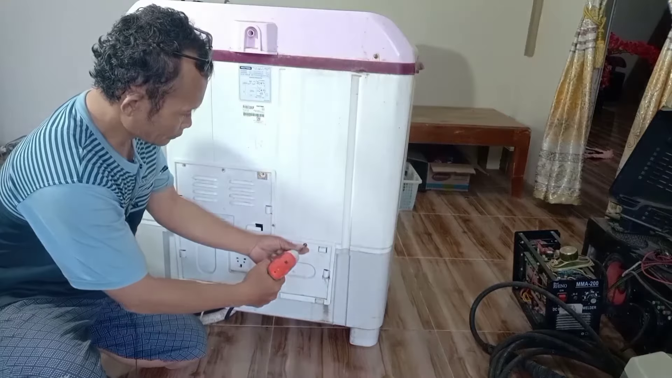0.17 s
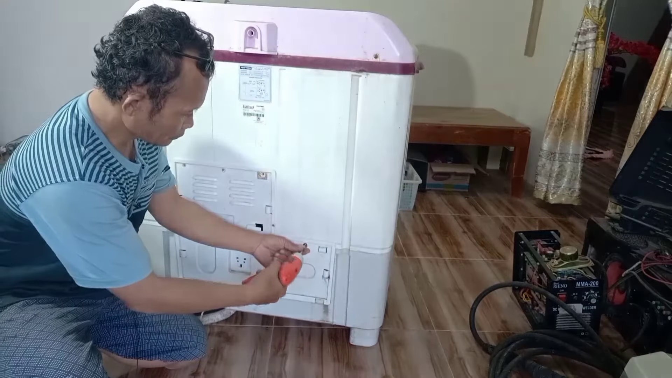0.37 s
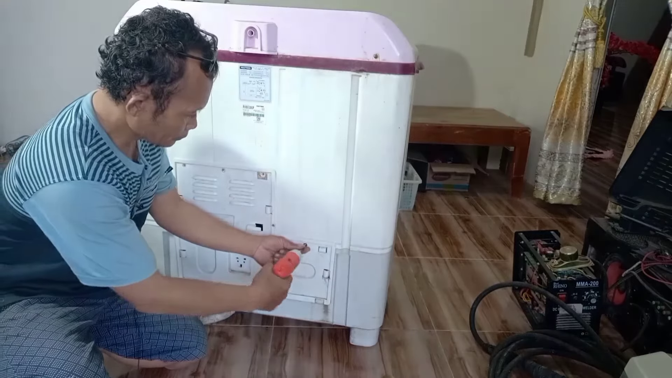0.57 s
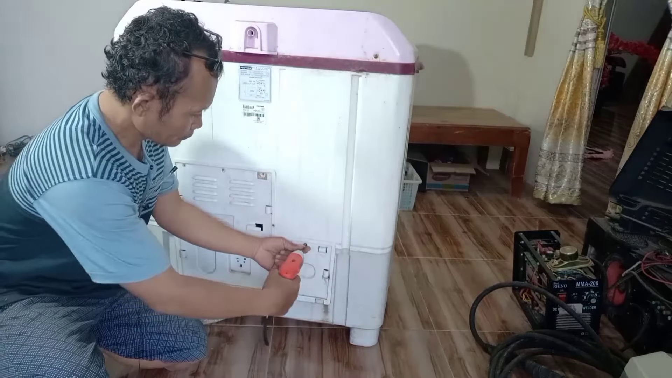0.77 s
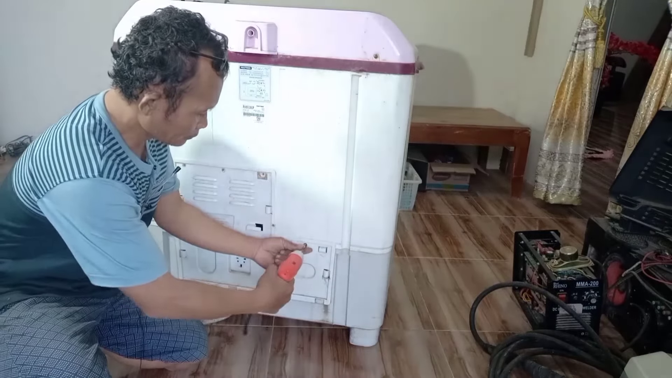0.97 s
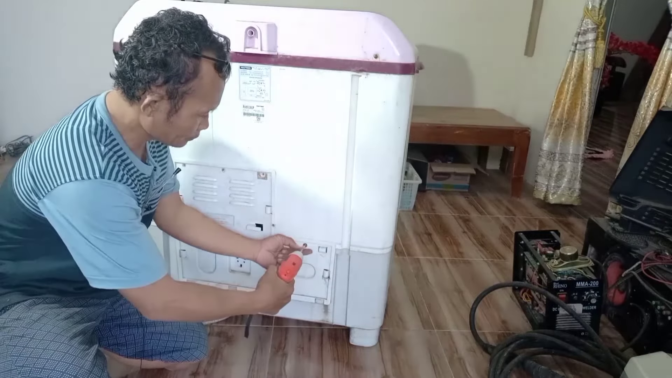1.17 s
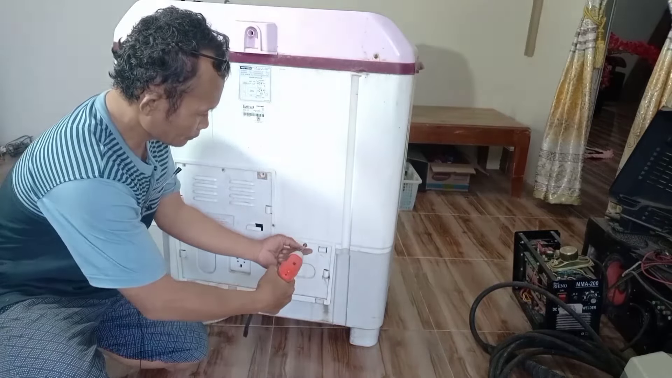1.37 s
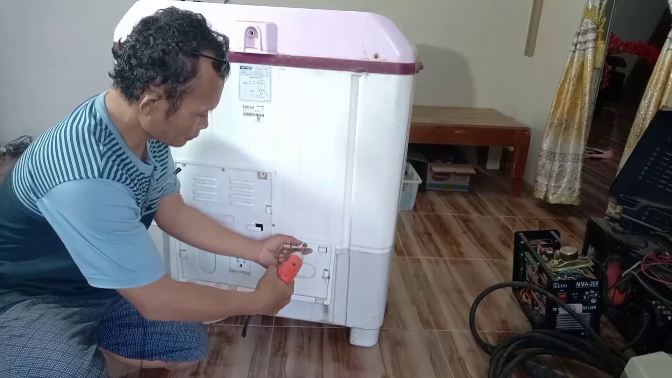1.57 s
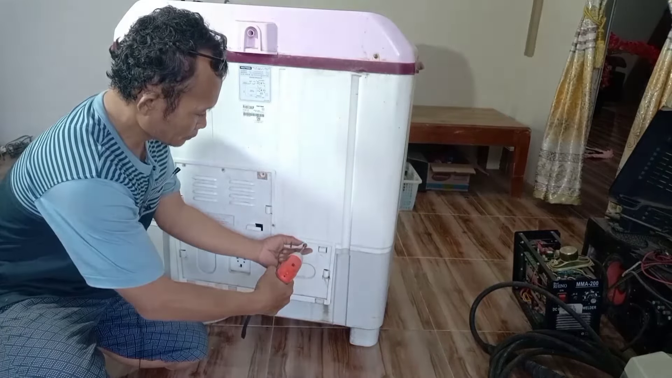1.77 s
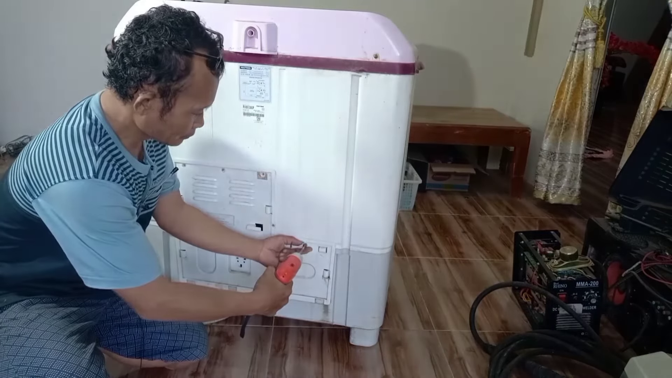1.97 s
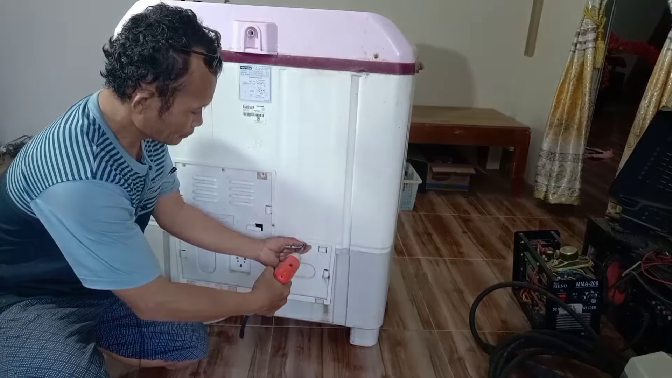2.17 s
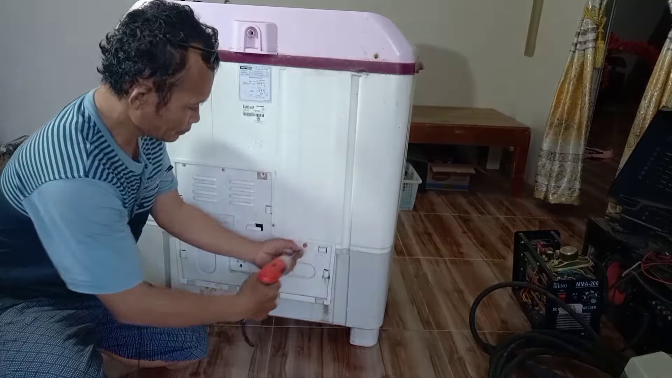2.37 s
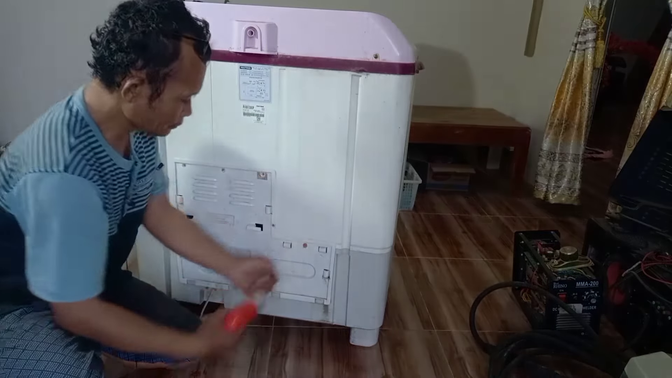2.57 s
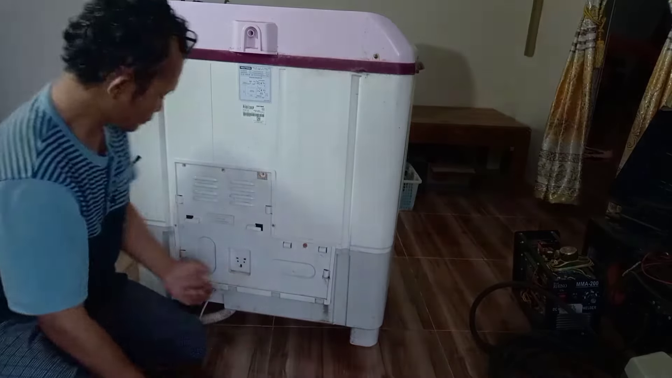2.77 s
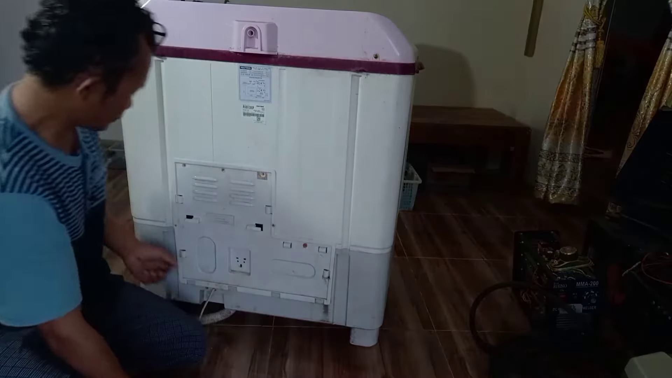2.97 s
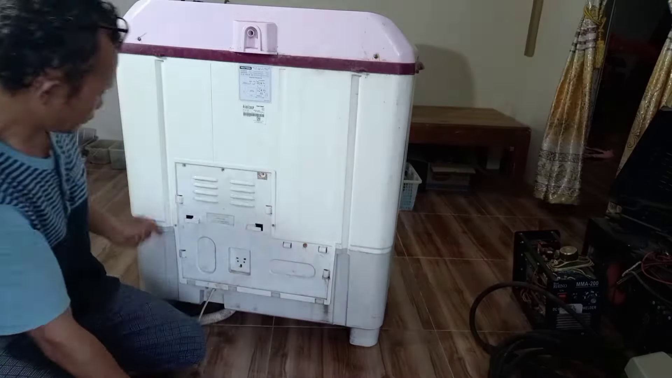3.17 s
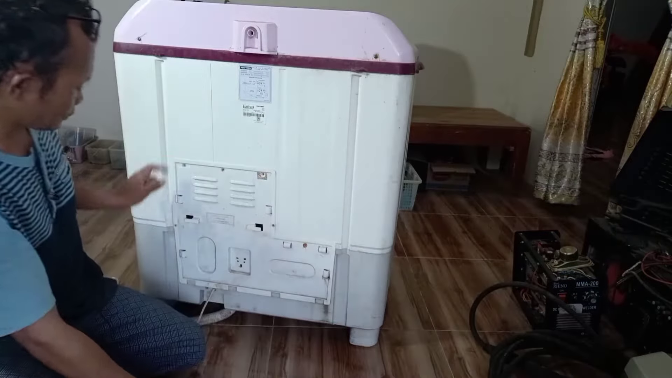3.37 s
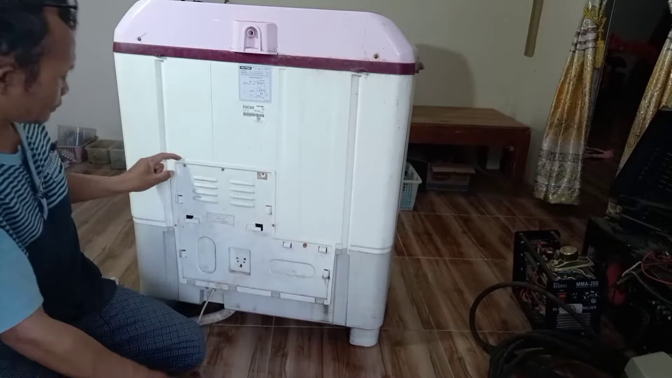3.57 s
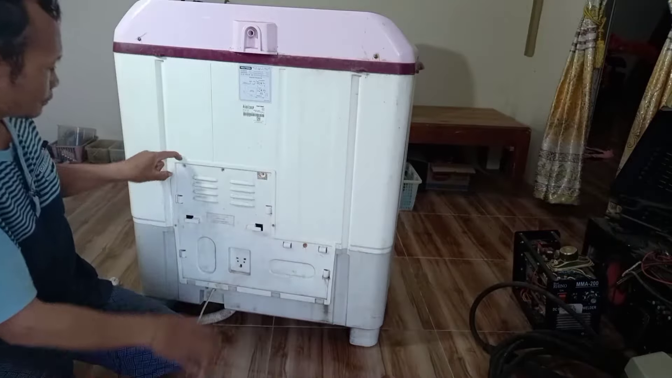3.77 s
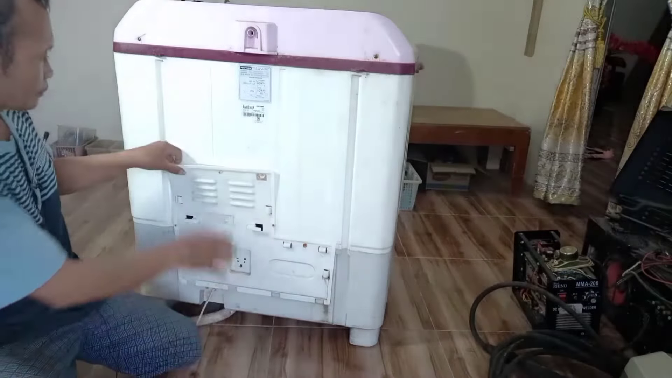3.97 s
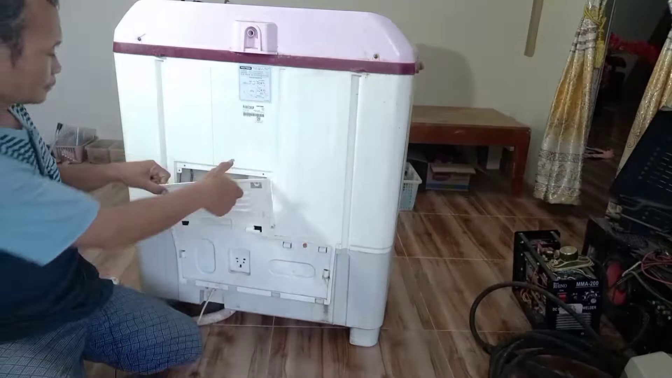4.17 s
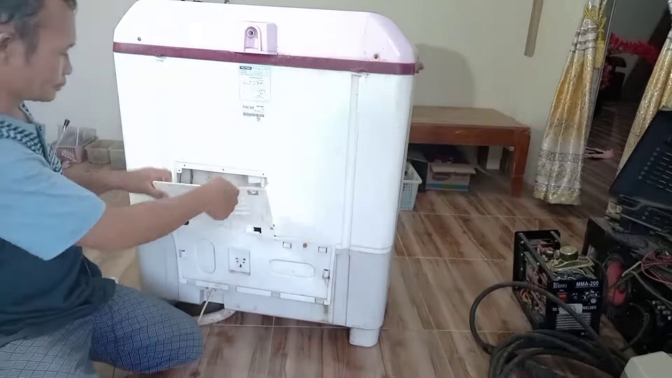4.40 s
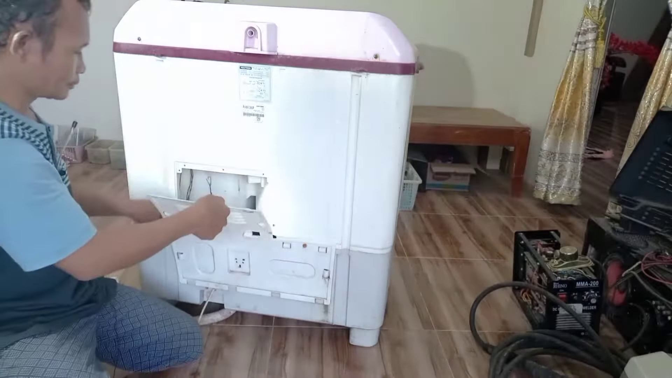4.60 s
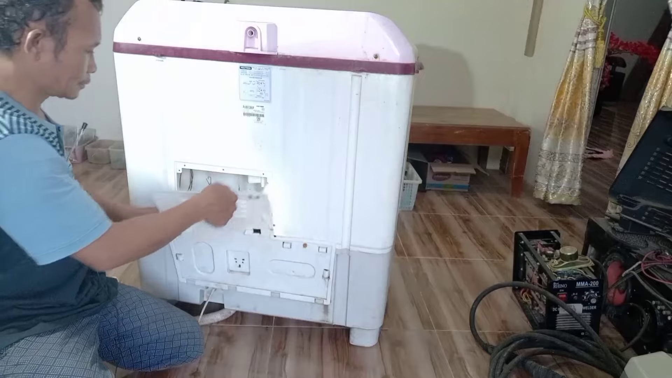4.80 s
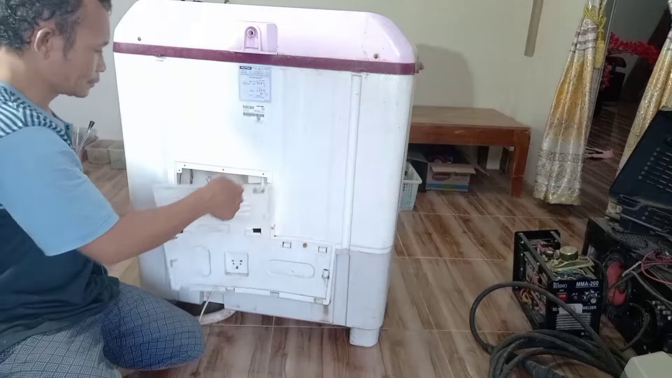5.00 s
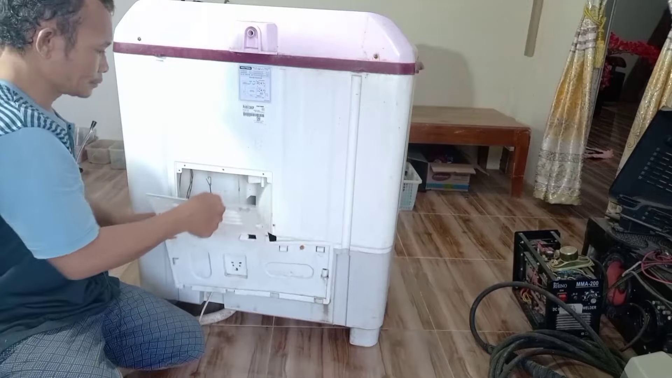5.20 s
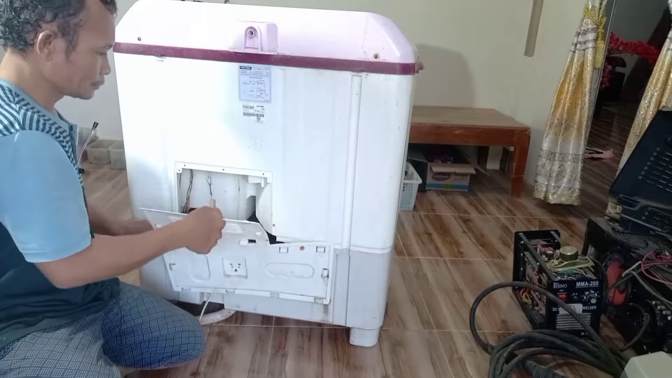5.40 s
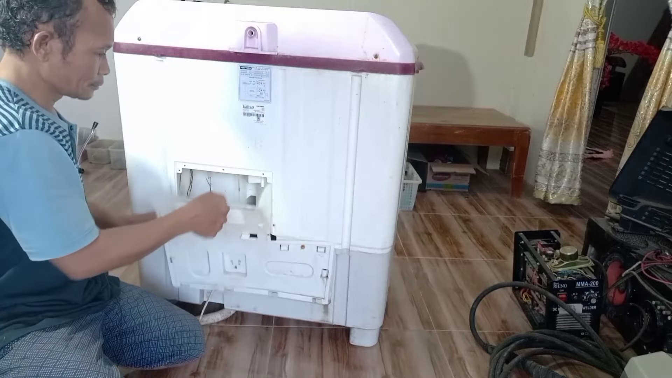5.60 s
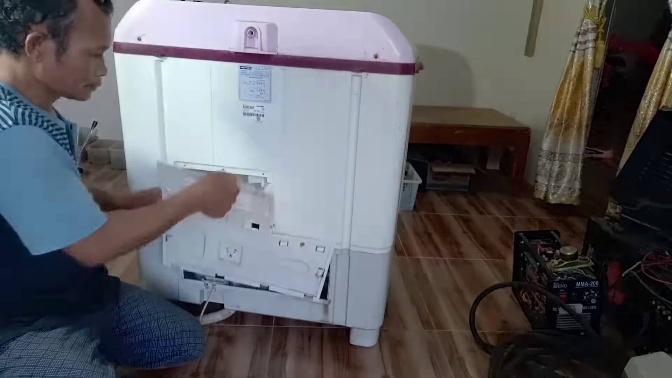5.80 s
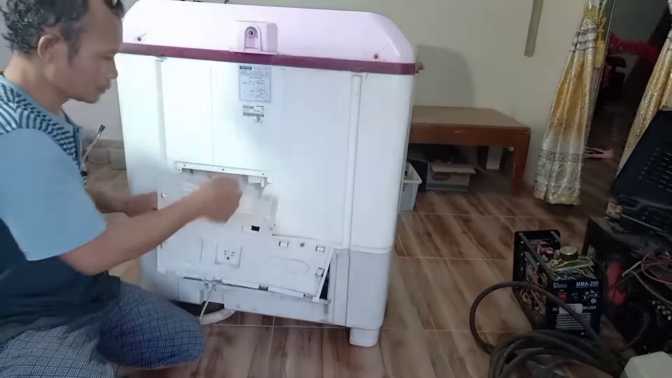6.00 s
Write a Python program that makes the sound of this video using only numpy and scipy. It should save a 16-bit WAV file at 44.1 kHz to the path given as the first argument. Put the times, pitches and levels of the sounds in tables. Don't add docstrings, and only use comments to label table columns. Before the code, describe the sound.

In a small tiled room, a small electric driver whines for under two seconds, then plastic clips crack and a hollow housing thuds and creaks.

```python
import sys
import numpy as np
from scipy import signal
from scipy.fft import rfft, irfft, next_fast_len
from scipy.io import wavfile
from scipy.ndimage import uniform_filter1d, map_coordinates

SR = 44100
rng = np.random.default_rng(int(sys.argv[2]) if len(sys.argv) > 2 else 0)


def dump_mix(stems):
    frames = np.atleast_2d(stems).T
    limited = np.clip(frames, -1, 1)
    pcm = np.round(limited * 32767).astype(np.int16)
    wavfile.write(sys.argv[1], SR, pcm)


def boost_factor(decibels):
    exponent = np.asarray(decibels, float) / 20
    return 10 ** exponent


N = 266672

# t/s, motor speed f/Hz, load on the bit level/dB
DRIVE = [(1.08, 135.1, 2.5), (1.12, 169.5, -0.5), (1.19, 211, -1), (1.24, 224.6, -3), (1.32, 236.9, -3),
         (1.47, 253.5, -4.5), (1.8, 283, -5.5), (2.02, 303, -9), (2.12, 307.2, -12), (2.3, 307.7, -14),
         (2.47, 305.2, -15.5)]
# multiple of motor turns, level/dB
ROTOR = [(1, 2), (2, -13)]
# multiple of motor turns, level/dB
SEGMENTS = [(3, 8.5), (4, -6.5), (6, -4), (9, -10)]
# multiple of motor turns, level/dB
PLANET = [(.298, -10), (.595, 2.5), (1.19, -3), (1.785, -11), (2.38, -6), (3.57, -13), (4.165, -16.5),
          (8.33, -20), (8.93, -6.5)]
# multiple of motor turns, level/dB
MESH = [(5, 0.5), (5.34, 7), (5.67, -2), (6.34, -2.5)]
# multiple of motor turns, level/dB
OVERTONES = [(10.33, -2), (10.67, 4.5), (11, -3), (16, 2), (16.4, -7), (18.35, -4), (18.72, -4),
             (19.05, -6), (21.33, 3), (21.75, -1), (26.67, 3), (32, 4)]
# multiple of motor turns, level/dB
ARCS = [(17.5, -8), (18, -5), (22, -3), (24, -2), (29, -2), (30, -2), (32, 3), (37, 1), (40, 2), (41, 5),
        (43, -3)]
# f/Hz, width f/Hz, level/dB
BRUSH = [(6670, 340, -12), (7800, 600, -8), (8270, 260, 2), (9500, 320, 0), (10230, 700, 3),
         (10990, 480, 4.5), (12050, 670, 2), (12700, 500, -6.5), (14400, 1200, -22)]
# f/Hz, level/dB per Hz
CASING = [(71, -33), (120, -10), (166, -3), (249, -11), (291, -13.5), (437, -14), (716, -11), (821, -11),
          (1320, -17), (2360, -6.5), (2940, -14), (4900, -13.5), (5250, -10.5), (5700, -15), (7000, -17),
          (8740, -16.5), (15400, -120)]
# f/Hz, level/dB
HOUSING = [(300, -29), (610, -20), (690, -4), (830, -7.5), (1150, -13), (2500, -7.5), (16000, -13.5)]
# f/Hz, level/dB
GEARBOX = [(1400, -29), (2100, 3), (2650, 3), (3000, -5), (3750, 3), (4200, 2), (4400, -6), (4670, 6),
           (4950, -12), (5350, -5), (6600, -12), (9000, -24)]
# motor f/Hz, level/dB
GRIP = [(135, -40), (190, -59), (212, -47.5), (235, -34.5), (259, -45.5), (273, -44.5), (284, -36),
        (303, -40.5)]
# motor f/Hz, level/dB
CARRIER = [(150, -80), (170, -44), (188, -46.5), (210, -55), (237, -47), (283, -42.5), (303, -45.5)]
# f/Hz, level/dB
PRESSED = [(7600, 0.5), (8200, 1.5), (8750, -8), (9400, 3), (10000, -3), (11000, 2.5), (13000, 3.5),
           (15000, 1)]
# f/Hz, level/dB
LOOSE = [(7600, 1), (8300, -0.5), (8900, 1), (9700, -1.5), (10600, 2.5), (11500, -3), (13000, 1),
         (15000, 1)]

# t/s, knock level/dB, hollowness level/dB, sharpness level/dB
HANDLING = [(.013, -43, 9.5, -13), (.059, -45, 9, -13), (.535, -36.5, 2, -18), (.539, -37.5, 8, 1.5),
            (.549, -49.5, 25, -26), (.762, -51, 18.5, -18), (1.026, -65, 7, 12), (1.05, -59, 0, 7),
            (2.854, -56, 10.5, 13), (3.02, -55, -5, 4), (3.152, -41, -11, -19), (3.302, -51.5, 3, -6),
            (3.33, -48, 8, 11.5), (3.355, -65, 11, -3), (3.369, -36, 3.5, -32), (3.413, -50.5, 1, 2),
            (3.474, -55, -3, 8), (3.694, -47, -15, -28)]
# t/s, knock level/dB, hollowness level/dB, sharpness level/dB, tilt/dB per octave
FLEXING = [(4.098, -28.5, 4, -12.5, -1), (4.107, -33.5, 0, -9, -2), (4.113, -26.5, -16, -12, -4),
           (4.223, -28.5, -1.5, -14, -4), (4.227, -25, -1, -15.5, 1), (4.288, -32, -15.5, -15, 1),
           (4.299, -26, -1.5, -15, -3), (4.757, -22.5, -1.5, -31, 0), (4.784, -29, 4, -25, -6),
           (4.818, -29.5, -19, -29, -2), (5.026, -27.5, -2.5, -16, 1), (5.084, -35.5, 10.5, -21, 9),
           (5.23, -36.5, -2, -15.5, 1), (5.321, -36, -19, -27, 4.5), (5.823, -38.5, 5.5, -14, 3),
           (6.008, -32.5, 4, -18, 1)]
# t/s, knock level/dB, hollowness level/dB, sharpness level/dB, edge tilt/dB per octave
CLIPS = [
    (1.066, -56, 10, 13, 5),
    (2.924, -43.5, -14, 15, -5),
    (2.927, -40, -14, 12, 0.5),
    (2.989, -53, 2, 18, 1),
    (4.306, -25.5, -7, -18, 2),
    (4.774, -19, -7.5, -12.5, 0),
    (5.0665, -17.5, -12, -4.5, -3),
    (5.348, -17.5, -3.5, 5.5, -1),
    (5.981, -28, 2, 14, 3),
]
# f/Hz, width f/Hz, level/dB
BOOM = [(103.3, 13, 1.5), (132, 19, -2.5), (181, 12, 2.5), (276, 140, -1)]
# f/Hz, width f/Hz, level/dB
KNOCK = [(346, 70, 5.5), (481.5, 32, 4.5), (597, 90, 2), (696, 83, -1), (876, 42, -1), (1116, 630, -5.5)]
# f/Hz, width f/Hz, level/dB
CLACK = [(1340, 1000, 7), (2150, 380, 8.5), (2540, 150, 4.5), (3040, 740, -17), (4230, 7300, 1)]
# f/Hz, width f/Hz, level/dB
SNAP = [(4400, 6500, 1), (7000, 940, -3), (9600, 1400, -2), (11140, 2500, 6.5), (12800, 1100, -6)]
# f/Hz, level/dB
DULL = [(12300, 0.5), (13500, -4), (15500, -8)]
# t/s, f/Hz, peak level/dB, t60/s
RINGS = [(0.552, 151, -22.5, 0.18), (3.368, 200, -35, .06), (4.105, 186, -17.5, 0.1),
         (4.106, 1208, -28, 0.094), (4.108, 493, -21, .08), (4.226, 678, -18, 0.054),
         (4.227, 1283, -31.5, 0.059), (4.233, 276, -16.5, 0.081), (4.29, 522, -20, 0.077),
         (4.291, 1340, -28.5, 0.1), (4.307, 566, -10, 0.057), (4.307, 2025, -23.5, 0.034),
         (4.322, 185, -19.5, 0.16), (4.76, 692, -23, 0.11), (4.775, 1257, -26, 0.087),
         (4.795, 407, -21, 0.081), (4.759, 298, -20, 0.11), (4.774, 253, -9, 0.078), (4.773, 596, -20, .07),
         (4.783, 711, -18, 0.079), (4.815, 284, -17.5, .06), (4.861, 273, -24, .05),
         (5.002, 503, -34, 0.056), (5.027, 560, -17, 0.046), (5.028, 281, -19, 0.096),
         (5.068, 900, -22.5, 0.15), (5.067, 2185, -28, 0.14), (5.069, 131.4, -24, 0.19),
         (5.08, 316, -15, 0.059), (5.232, 323, -29.5, .06), (5.349, 636, -12.5, 0.047),
         (5.35, 2610, -33, 0.2), (5.358, 368.4, -21, 0.2), (5.36, 111, -23.5, 0.25), (5.806, 454, -37, .05),
         (5.82, 596, -36, .08), (3.67, 500, -39, .12), (3.695, 520, -35, .12), (3.72, 490, -37, .1),
         (5.384, 2100, -24, .03), (5.4, 2600, -28, .06)]
# t/s, f/Hz, peak level/dB, t60/s
TICKS = [(.545, 2130, -35, .04), (1.027, 12000, -43, .04), (1.03, 9800, -41, .04), (1.031, 4300, -47, .04),
         (1.05, 4000, -46, .02), (1.068, 8300, -34, .012), (2.9285, 4120, -24, 0.013),
         (2.9285, 9000, -31, .015), (2.929, 11500, -28, .015), (2.935, 9800, -38, .02),
         (2.9905, 11400, -30, .012), (2.993, 3500, -28.5, .012), (3.018, 11500, -39, .012),
         (3.018, 7700, -39, .015), (3.018, 3400, -41, .012), (4.102, 5080, -31, .015),
         (4.114, 5830, -30, .015), (4.292, 6150, -35, .02), (4.308, 750, -9, 0.018),
         (5.068, 2940, -23, 0.057), (5.068, 4480, -31, 0.077), (5.068, 7560, -24.5, .02),
         (5.069, 3550, -34, 0.11), (5.069, 5950, -41, 0.1), (5.087, 1980, -22, .02),
         (5.356, 2445, -21, .06), (5.352, 2010, -29, .12), (5.983, 2400, -20, .04),
         (5.983, 2830, -20, 0.035), (5.992, 7100, -35, 0.14), (5.983, 12300, -13, 0.019),
         (5.983, 10900, -16, .02), (5.983, 7400, -18, .015), (5.0683, 2000, -12, .03),
         (5.069, 10400, -28, 0.027), (5.069, 13000, -31, 0.023), (5.351, 12600, -22, .02),
         (5.352, 9000, -21, .04), (3.331, 11000, -35, 0.022), (4.776, 1890, -21.5, 0.048),
         (.541, 4200, -34, 0.013), (6.011, 11000, -31, .006), (6.011, 12500, -28, .006),
         (6.011, 14300, -29, .006)]
# t/s, pitch f/Hz, level/dB
SQUEAK = [
    (4.085, 11800, -57),
    (4.112, 12050, -57),
    (4.14, 12050, -62),
    (4.162, 12800, -62),
    (4.165, 11750, -55),
    (4.195, 12400, -60),
    (4.235, 11600, -58),
    (4.27, 12200, -64),
    (4.322, 11600, -64),
]

# t/s, level/dB
FAR = [(0, -40.5), (.24, -41), (.45, -43), (1.06, -46.5), (2.85, -47.5), (3.31, -46), (3.63, -43),
       (3.78, -45.5), (3.99, -49), (4.4, -45), (4.81, -42), (5.15, -40), (5.55, -45), (5.76, -45),
       (5.92, -46), (6.05, -38)]
# f/Hz, level/dB per Hz
RUMBLE = [(12, -58), (20, -6), (48, -23), (70, 0), (119, -3), (172, -17), (193, -38), (228, 7), (259, -38),
          (283, -4), (420, -19), (550, -64), (920, -120)]
# f/Hz, width f/Hz, level/dB
DRONE = [(82.7, 7.7, 2.5), (128, 11, 3.5), (178, 12, -8), (226, 44, -7.5)]
# f/Hz, level/dB per Hz
TONE = [(150, -22.5), (250, -1), (264, -11), (303, -10.5), (522, -12), (1270, -19.5), (1640, -20.5),
        (4150, -29.5), (5090, -28), (6500, -36), (8450, -58), (14300, -120)]
# f/Hz, level/dB per Hz
RUSTLE = [(2350, -45), (4000, -3), (4540, -32), (4900, -39), (5500, -5), (11200, 0), (12900, -4),
          (15400, -9), (16000, -29)]
# t/s, width t/s, level/dB
MOVES = [
    (1.05, 0.029, 8),
    (2.85, 0.23, 6),
    (3.5, 0.26, 6),
    (4.27, 0.13, 5.5),
    (4.65, 0.41, 4),
    (5.02, 0.014, 11.5),
    (5.2, 0.27, 2.5),
    (5.55, 0.26, 5),
    (5.825, 0.037, 10.5),
]
# multiple of its pitch, level/dB
BUZZ = [(2, -72), (3, -63), (4, -63), (5, -66), (8, -71), (9, -66), (10, -64), (11, -65), (12, -68),
        (13, -73)]
# f/Hz, t60/s
ROOM = [(100, 0.28), (400, 0.29), (1600, 0.47), (2350, 0.54), (3000, 0.34), (6000, 0.28), (14000, 0.32)]


def driver():
    bite_s, seat_s, free_s, slack_s = 1.114, 1.288, 2.055, 0.47
    coast_s, drag_hz = 0.84, 303
    t = np.arange(N) / SR
    held_hz, load_db = curves(DRIVE)
    off_s = DRIVE[-1][0]
    coast = np.exp(-np.clip(t - off_s, 0, None) / coast_s)
    speed_hz = np.maximum((held_hz + drag_hz) * coast - drag_hz, 20)
    lost_db = 20 * np.log10(held_hz / speed_hz)
    slack = np.clip((t - free_s) / slack_s, 0, 1)
    turns = np.cumsum(speed_hz) / SR

    def law(db, load, lost, slack_db):
        return db + load * load_db - lost * lost_db - slack_db * slack

    def before(s, rise_s):
        return np.clip((s - t) / rise_s, 0, 1)

    def beat(k, depth):
        return 1 + depth * np.cos(2 * np.pi * k * turns + 0.46 * wobble(22.32))

    jolt_db = 4.5 * np.exp(-((t - off_s + 0.0075) / 0.03) ** 2)
    hiss_db = law(-29.5, 0.87, 2, -6) + 0.61 * jolt_db
    hiss_db -= 11 * before(bite_s, 0.039) + 3 * before(seat_s, 0.12)
    grind_db = law(-28, 1, 1.2, -2.5) + jolt_db
    mesh_db = law(-42.5, 2, 3, -3)
    mesh_db += 4 * np.exp(-((speed_hz - 219) / 14) ** 2)
    mesh_db -= 45 * before(bite_s + 0.0046, 0.093) + 6 * before(1.05, 0.16)
    overtone_db = law(-44, 1.6, 3, 3) - 25 * before(1.105, 0.03) + 4 * (before(1.59, 0.08) - 1)
    rotor_db = law(-0.5, 0, 0, 15) + along(GRIP, speed_hz)
    planet_db = law(0.5, 0, 0, 29) + along(CARRIER, speed_hz)
    segment_db = law(-42, 0.5, 2.5, -0.5) - 19 * before(seat_s + 0.029, 0.059)
    arc_db = law(-53, 0.2, 14, -1) - 12 * before(seat_s + 0.1, 0.2)

    brush = filtered(rung(BRUSH), lambda hz: boost_factor(-12 * np.exp(-((hz - 8740) / 210) ** 2)))
    tight = np.clip(1.5 + load_db / 8, 0, 1)
    pressed = filtered(brush, lambda hz: boost_factor(along(PRESSED, hz)))
    loose = filtered(brush, lambda hz: boost_factor(along(LOOSE, hz)))
    brush = tight * pressed + (1 - tight) * loose
    brush *= beat(0.39 / 2, np.clip(lost_db / 7, 0, 0.8))
    brush *= boost_factor(7 * (before(2.716, 0.036) - 1))
    hiss = brush * beat(0.69, 0.28) * beat(1.4, 0.38) * beat(0.33, 0.32)
    hiss = unit(hiss * boost_factor(1.65 * wobble(90) + 0.6 * wobble(26.35)))
    grind = unit(noise(CASING) * beat(0.93, 0.26) * beat(0.33, 0.15) * boost_factor(1.7 * wobble(90)))

    segments = boost_factor(segment_db + 2.5) * orders(SEGMENTS, turns, 0.71, 0.18)
    shudder = np.interp(t, [2.55, 2.58, 2.64, 2.68], [0, 1, 1, 0])
    segments += boost_factor(-45) * shudder * np.sin(2 * np.pi * 4 * turns)
    motor = boost_factor(arc_db) * orders(ARCS, turns, 2.2, 0.1)
    motor += boost_factor(rotor_db) * orders(ROTOR, turns, 1.5, 0.66)
    motor += filtered(segments, lambda hz: boost_factor(along(HOUSING, hz)))

    gears = boost_factor(planet_db) * orders(PLANET, turns, 2, 0.2)
    uneven = boost_factor(mesh_db - 1 + 2.2 * wobble(60)) * beat(1 / 3, 0.5)
    gears += uneven * orders(MESH, turns, 2, 0.7)
    whine = boost_factor(overtone_db + 4 - 5 * lost_db + 1.2 * wobble(70)) * beat(1 / 3, 0.45)
    whine *= orders(OVERTONES, turns, 1.8, 0.14)
    gears += filtered(whine, lambda hz: boost_factor(along(GEARBOX, hz)))
    on = np.interp(t, [1.074, 1.085, 1.094, 1.098, 2.84, 2.88], [0, 0.14, 0.62, 0.98, 1.0, 0.053])
    return on * (boost_factor(hiss_db) * hiss + boost_factor(grind_db - 1.5) * grind + motor + gears)


def contacts():
    out = np.zeros(N + SR)
    t, hz = np.arange(16384) / SR, np.fft.rfftfreq(16384, 1 / SR)
    # modes, trim dB, push s, room dB
    parts = [(BOOM, 1, 0.003, -1), (KNOCK, 2, 0.002, 1), (CLACK, 4, 0.0008, -3), (SNAP, 9, 0.0006, -4)]
    lag_s = 0.0018
    kinds = [(HANDLING, 2), (FLEXING, -5.5), (CLIPS, 1.5)]
    rows = [(rib_db, *row) for table, rib_db in kinds for row in table]
    for rib_db, s, db, hollow_db, sharp_db, *tilt_db in rows:
        part_db = hollow_db, 0, 0.37 * sharp_db + rib_db, sharp_db
        hit, spread = np.zeros(len(t)), np.zeros(len(hz))
        soft = np.clip((max(hollow_db, 0) - sharp_db - 11 - 7 * (rib_db > 0)) / 7, 0, 1)
        late = np.clip(t - lag_s * (1 - 0.77 * soft), 0, 1)
        for (modes, trim_db, push_s, wet_db), level_db in zip(parts, part_db):
            power = body(modes, scatter_db=1.8)(hz)
            if modes is KNOCK or modes is SNAP:
                power = power * boost_factor(2 * sum(tilt_db) * np.log2(hz / modes[2][0] + 0.085))
            fade_s = push_s + 0.0022 * soft * (modes is SNAP)
            push = rng.standard_normal(len(t)) * late * np.exp(-late / fade_s)
            push[round((lag_s + push_s) * SR)] += 0.85 * (1 - soft) * np.linalg.norm(push)
            ring = irfft(rfft(push) * causal(power))
            ring *= boost_factor(db + level_db + trim_db * (1 - 0.44 * soft)) / np.abs(ring).max()
            hit += ring
            spread += boost_factor(2 * wet_db) * power * np.sum(ring ** 2) / power.mean()
        out[round(s * SR):][:len(t)] += hit + room(irfft(causal(spread)))
    return filtered(out[:N], lambda hz: boost_factor(along(DULL, hz)))


def panel():
    out, t = np.zeros(N + SR), np.arange(SR // 3) / SR
    modes = RINGS + TICKS
    neighbours = rng.uniform(-0.996, 1, (len(modes), 2, 5, 1))
    for (s, hz, db, t60), (off, phase) in zip(modes, neighbours):
        crowd = np.clip((hz / 1200) ** 2, 0.08, 1)
        near_hz = hz * (1 + 0.06 * off)
        near = np.sin(2 * np.pi * near_hz * t + np.pi * phase).sum(axis=0)
        group = (1.4 - crowd) * np.sin(2 * np.pi * hz * t) + 0.6 * crowd * near
        swell = 1 - np.exp(-t * hz / 0.8)
        out[round(s * SR):][:len(t)] += boost_factor(db - 5.5 - 60 * t / t60) * swell * group
    far = filtered(out[:N], lambda hz: boost_factor(along([(1500, -0.5), (4000, -5.5)], hz)))
    return out[:N] + boost_factor(-6) * room(far)


def squeak():
    pitch_hz, level_db = curves(SQUEAK)
    turns = np.cumsum(uniform_filter1d(pitch_hz, size=500) * (1 + 0.0028 * wobble(150))) / SR
    upper = boost_factor(-7 + 2 * wobble(30)) * np.sin(2 * np.pi * 1.19 * turns)
    held = np.interp(np.arange(N) / SR, [4.075, 4.087, 4.32, 4.332], [0, 1, 1, 0])
    return held * boost_factor(level_db + 3.0 + 1.1 * wobble(60)) * (np.sin(2 * np.pi * turns) + upper)


def buzz():
    t = np.arange(N) / SR
    pitch_hz = 1108.5
    bursts = np.clip(3 * np.cos(2 * np.pi * (35.3 * t + 0.2 * wobble(20))) - 1.3, 0, 1)
    whine = sum(boost_factor(db) * np.sin(2 * np.pi * k * pitch_hz * t) for k, db in BUZZ)
    sparks = (rng.random(N) < 70 / SR) * boost_factor(-3 + 3 * rng.standard_normal(N))
    ticks = filtered(sparks, lambda hz: boost_factor(along([(3000, -24), (9000, 4.5), (14000, 0)], hz)))
    return bursts * whine + boost_factor(-37) * ticks


def background():
    t = np.arange(N) / SR
    rumble_db, = curves(FAR)
    tone_db = -53.5 + 0.14 * (rumble_db + 43.5) + 4 * np.exp(-t / 0.12)
    rustle_db = -62.5 + sum(db * np.exp(-((t - s) / width) ** 2) for s, width, db in MOVES)
    lumps = wobble(11)
    rumble = boost_factor(-2.5) * rung(DRONE) + boost_factor(-9.5) * noise(RUMBLE)
    rumble *= boost_factor(rumble_db + 0.68 * lumps)
    tone = boost_factor(tone_db + 0.74 * lumps + 0.85 * wobble(25.36)) * noise(TONE)
    rustle = boost_factor(rustle_db - 3.0 + 0.62 * wobble(21.15)) * noise(RUSTLE)
    return rumble + tone + rustle


def room(x):
    hz, t, z = signal.stft(rng.standard_normal(SR // 2), SR, nperseg=256)
    decay = boost_factor(-60 * t / along(ROOM, hz)[:, None])
    tail = signal.istft(z * decay, SR, nperseg=256)[1]
    return signal.fftconvolve(np.pad(x, (180, 0)), tail / np.linalg.norm(tail))[:len(x)]


def orders(table, turns, flutter_db, blur):
    run = slice(SR, 3 * SR)
    tones = 0
    for k, db in table:
        level = boost_factor(db + 2.0 + flutter_db * wobble(14)[run])
        phase = 2 * np.pi * k * turns[run] + blur * np.sqrt(k) * wobble(40)[run]
        tones = tones + level * np.sin(phase)
    return np.pad(tones, (run.start, N - run.stop))


def body(modes, scatter_db):
    gains = boost_factor(scatter_db * rng.standard_normal(len(modes)))
    low, high = 0.75 * modes[0][0], 1.06 * modes[-1][0]

    def power(f):
        edges = f ** 6 / (low ** 6 + f ** 6) * high ** 6 / (high ** 6 + f ** 6)
        peaks = sum((g * boost_factor(db) * f * w) ** 2 / ((c * c - f * f) ** 2 + (f * w) ** 2)
                    for (c, w, db), g in zip(modes, gains))
        return edges * peaks

    return power


def rung(modes):
    power = body(modes, scatter_db=1.5)
    return unit(filtered(rng.standard_normal(N), lambda hz: np.sqrt(power(hz))))


def noise(spectrum):
    return unit(filtered(rng.standard_normal(N), lambda hz: boost_factor(along(spectrum, hz))))


def causal(power):
    cepstrum = irfft(np.log(power + 1e-9 * power.max()) / 2)
    half = len(cepstrum) // 2
    cepstrum[1:half] *= 2
    cepstrum[half + 1:] = 0
    return np.exp(rfft(cepstrum))


def filtered(x, response):
    m = next_fast_len(len(x) + 8192)
    return irfft(rfft(x, m) * response(np.fft.rfftfreq(m, 1 / SR)), m)[:len(x)]


def wobble(rate):
    at = np.arange(0, N + 32, 32)
    knots = rng.standard_normal(int(N * rate / SR) + 4)
    return np.interp(np.arange(N), at, map_coordinates(knots, [at * rate / SR]))


def curves(rows):
    s, *cols = np.transpose(rows)
    return [np.interp(np.arange(N) / SR, s, c) for c in cols]


def along(points, hz):
    f, v = np.transpose(points)
    return np.interp(np.log(hz + 1), np.log(f + 1), v)


def unit(x):
    return x / np.sqrt(np.mean(x ** 2) + 1e-20)


def scene():
    tool = driver()
    cabinet = contacts() + panel() + squeak()
    return (tool + boost_factor(-9.0) * room(tool) + cabinet + background() + buzz())[None]


def roll_off(x):
    return signal.sosfilt(signal.butter(12, 16690, fs=SR, output="sos"), x)


def record(dry):
    top_hz = 15600

    def limit(hz):
        over_hz = hz - top_hz
        return boost_factor(-30 * np.clip(over_hz / 100, 0, 1) - 12 * np.clip(over_hz / 1000, 0, 1))

    mix = filtered(dry[0], limit)[None]
    return roll_off(mix)


dry = scene()
out = record(dry)
dump_mix(out)
```